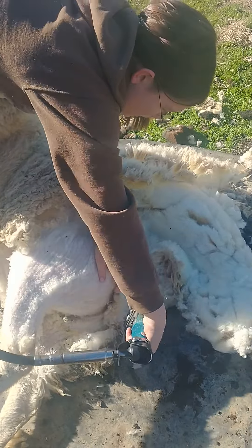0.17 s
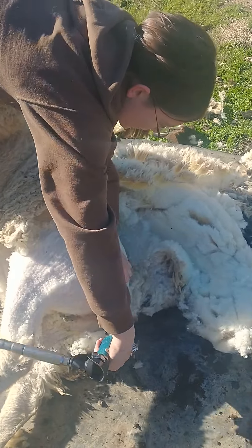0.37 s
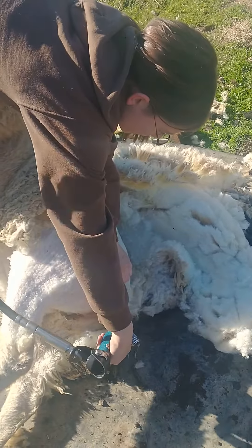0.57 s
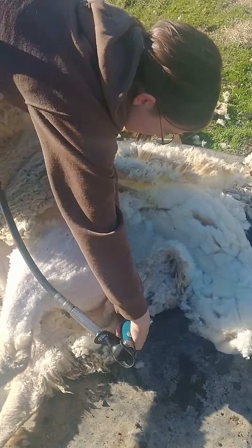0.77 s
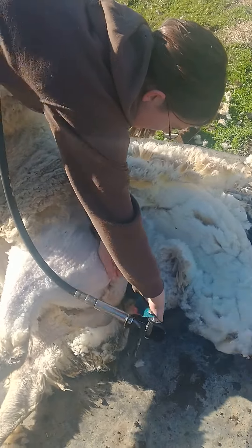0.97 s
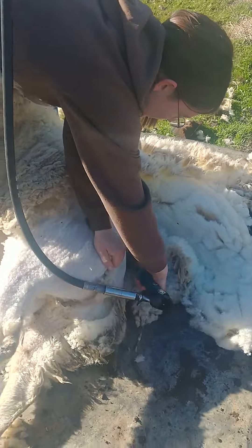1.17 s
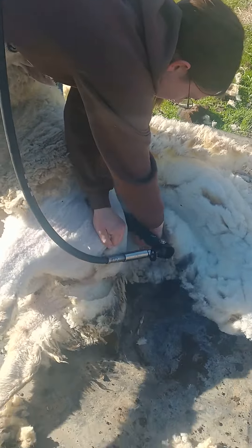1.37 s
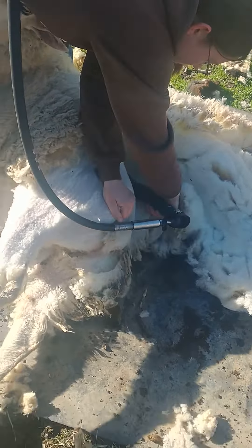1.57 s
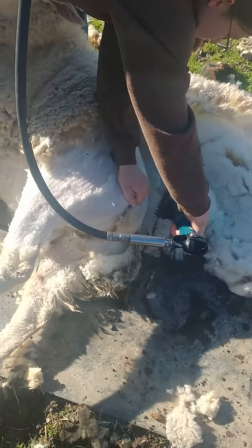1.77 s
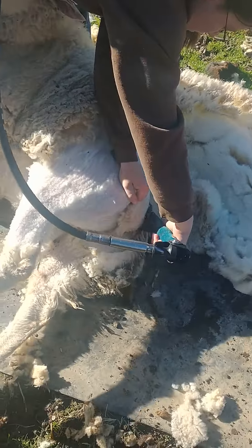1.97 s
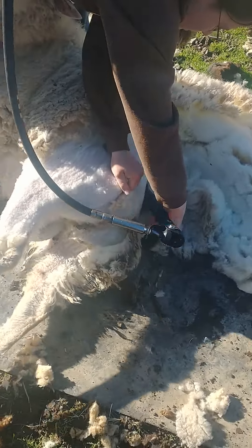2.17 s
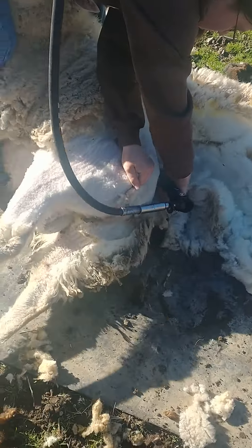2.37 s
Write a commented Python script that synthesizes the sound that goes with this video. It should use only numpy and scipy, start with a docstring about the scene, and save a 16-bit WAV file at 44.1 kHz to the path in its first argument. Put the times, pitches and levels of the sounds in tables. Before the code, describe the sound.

A powered sheep shearing handpiece buzzes and clatters steadily through wool, close up outdoors.

```python
"""Sheep shearing, close up

Outdoors, close to the microphone, a shaft-driven handpiece runs through a sheep's fleece.
The drive hums; the cutter swings about sixty times a second, buzzing, clacking at its turns
and scraping over the steel comb, which rings now and then. A little wind touches the microphone."""
import sys
import numpy as np
from scipy import signal
from scipy.fft import rfft, irfft
from scipy.io import wavfile
from scipy.ndimage import uniform_filter1d

SR = 44100
rng = np.random.default_rng(int(sys.argv[2]) if len(sys.argv) > 2 else 0)


def dump(signal):
    """Clip the signal to [-1, 1] and save it as 16-bit WAV at the path in sys.argv[1]."""
    limited = np.clip(np.atleast_2d(signal).T, -1, 1)
    pcm = np.round(limited * 32767).astype(np.int16)
    wavfile.write(sys.argv[1], SR, pcm)


N = 111132
T = np.arange(N) / SR
DRIVE_HZ, STROKE_HZ = 37.82, 59.485


def from_db(db):
    """Decibels to gain."""
    return 10 ** (np.asarray(db) / 20)

def unit_power(x):
    """Scale to a mean square of 1."""
    return x / np.sqrt(np.mean(x ** 2) + 1e-20)

def in_time(rows):
    """The columns of a timed table at every sample."""
    times, *columns = np.transpose(rows)
    return [np.interp(T, times, column) for column in columns]

def drift(rate_hz):
    """Slow random wander of unit power, changing about rate_hz times a second."""
    hz = np.fft.rfftfreq(2 * N, 1 / SR)
    spectrum = rfft(rng.standard_normal(2 * N)) / (1 + (hz / rate_hz) ** 2)
    return unit_power(irfft(spectrum)[:N])

def coloured(x, colour):
    """Give x a smooth spectrum, at unit power."""
    hz, db = np.transpose(colour)
    bins = np.fft.rfftfreq(2 * N, 1 / SR) + 1
    gain = from_db(np.interp(np.log(bins), np.log(hz), db))
    return unit_power(irfft(rfft(x, 2 * N) * gain)[:N])

def resonance(x, hz, width_hz):
    """One resonance with gain 1 at its peak."""
    r = np.exp(-np.pi * width_hz / SR)
    feedback = [1, -2 * r * np.cos(2 * np.pi * hz / SR), r * r]
    return signal.lfilter(np.array([1, 0, -1]) * (1 - r * r) / 2, feedback, x)

def turns_at(hz, wander_depth=.0007):
    """Turns made by a shaft whose speed wanders slightly."""
    wander = drift(3)
    return np.cumsum(hz * (1 + wander_depth * (wander - wander.mean()))) / SR

def partials(turns, orders, flutter):
    """Multiples of a shaft's rate, each fluttering a little in level and phase."""
    tone = np.zeros(N)
    for order, db in orders:
        amplitude = np.sqrt(2) * from_db(db) * (1 + flutter * drift(4.2))
        tone += amplitude * np.sin(2 * np.pi * (order * turns + rng.random()) + flutter * drift(13))
    return tone

def clicks(strokes, contacts, jitter_s, scatter_db, shifting_db):
    """A click for each contact of each stroke; they trade strength and shift as the load changes."""
    train, count = np.zeros(N), np.arange(int(strokes[-1]) + 1)
    for share, db in contacts:
        times = np.interp(count + share, strokes + .02 * drift(1.5), T, right=np.inf) - .001
        times += jitter_s * rng.standard_normal(len(times))
        scatter = scatter_db * rng.standard_normal(len(times))
        strength = from_db(db + scatter + shifting_db * np.interp(times, T, drift(.8)))
        inside = (times > 0) & (times < T[-1])
        train[(times[inside] * SR).astype(int)] += strength[inside]
    return train / np.sqrt(uniform_filter1d(train ** 2, size=8900) + 1e-12)   # even power over 0.2 s

def friction(hits, decay_s, steady, grain_db):
    """Gritty noise that flares at every contact and dies down to a steady share."""
    flare = unit_power(signal.lfilter([1], [1, -np.exp(-1 / (decay_s * SR))], hits))
    grit = rng.standard_normal(N) * from_db(grain_db * rng.standard_normal(N))
    return grit * np.sqrt(flare ** 2 + steady ** 2)


# spectrum of the outdoor background: (frequency [Hz], relative level [dB])
RUMBLE_COLOUR = [(25, -23.5), (50, -24), (75, -7), (120, -8.5), (165, 1.5), (235, -1), (320, -2),
                 (480, -6), (800, -3), (1500, -4.5), (4000, -27)]
def rumble():
    """The machine and the open air rumble steadily behind the shearing."""
    return from_db(-43.5) * coloured(rng.standard_normal(N), RUMBLE_COLOUR)

# puffs at the microphone: (time [s], half length [s], level [dB])
WIND_PUFFS = [(.84, 0.016, -43), (1.02, 0.035, -55), (1.914, 0.036, -38.5), (2.17, 0.064, -42),
              (2.246, 0.023, -52)]
# their spectrum: (frequency [Hz], relative level [dB])
WIND_COLOUR = [(25, -35), (55, -15), (85, 6.5), (125, 9), (170, -4.5), (400, -31.5), (1000, -42)]
def wind():
    """A few soft, low puffs of wind touch the microphone."""
    gusts = sum(from_db(db) * np.exp(-.5 * ((T - at) / half) ** 2) for at, half, db in WIND_PUFFS)
    return gusts * coloured(rng.standard_normal(N), WIND_COLOUR)

# partials of the hum: (multiple of the turn rate, level [dB])
HUM_PARTIALS = [(2, -55.5), (3, -55), (4, -55), (5, -40.5), (6, -43.5), (7, -48), (8, -49.5), (10, -52.5),
                (12, -58.5), (14, -61.5), (15, -64), (16, -60.5)]
def drive(spread_turns=.28, throb_depth=.25):
    """The drive hums and throbs twice a turn, one throb stronger."""
    turns = turns_at(DRIVE_HZ)
    hum = np.zeros(N)
    for order, db in HUM_PARTIALS:
        amplitude = np.sqrt(2) * from_db(db) * (1 + .09 * drift(8))
        lag = spread_turns * (order - 5) ** 2   # phases spread away from the strongest partial
        hum += amplitude * np.cos(2 * np.pi * (order * turns - lag))
    return hum * (1 + throb_depth * np.cos(2 * np.pi * (turns - spread_turns)))

# partials of the buzz: (multiple of the stroke rate, level [dB])
BUZZ_PARTIALS = [(2, -51), (4, -61), (6, -54.5), (12, -60.5), (13, -66.5), (14, -56.5), (15, -63),
                 (16, -56.5), (17, -56), (18, -60.5), (24, -60), (26, -59.5), (27, -65)]
# three strong partials of the whine: (time [s], lower level [dB], middle level [dB], upper level [dB])
WHINE_LEVELS = [(0, -51.5, -51.5, -51), (.6, -46, -53, -47.5), (1.0, -50, -49.5, -47.5),
                (1.3, -46, -42.5, -50.5), (1.5, -44.5, -45, -47.5), (1.77, -47.5, -39.5, -60),
                (2.1, -45.5, -40.5, -59), (2.28, -48.5, -44, -56), (2.52, -46.5, -42, -52)]
def buzz_and_whine(strokes):
    """The swinging cutter makes the handpiece buzz and whine at multiples of the stroke rate."""
    buzz = partials(strokes, BUZZ_PARTIALS, flutter=.32)
    whine = partials(strokes, zip((19, 21, 23), in_time(WHINE_LEVELS)), flutter=.09)
    return buzz + whine

# resonances of the housing: (frequency [Hz], width [Hz], level [dB])
HOUSING_MODES = [(854, 120, -54.5), (1852, 98, -49), (2665, 290, -48), (3420, 160, -48), (6180, 83, -46.5),
                 (6700, 230, -44.5)]
# hollow resonance of the handpiece: (time [s], level [dB])
HOLLOW_LEVEL = [(0, -44.5), (.7, -48.5), (1.0, -50), (1.14, -45.5), (1.5, -41.5), (1.6, -52.5),
                (2.52, -53.5)]
def housing(hits, grip_db=2, hollow_hz=1590):
    """The contacts keep the housing ringing; the grip damps and frees it, and a hollow note swells."""
    push = friction(hits, decay_s=.0018, steady=.3, grain_db=1.5)
    rings = np.zeros(N)
    for hz, width, db in HOUSING_MODES:
        grip = from_db(grip_db * drift(4.5))
        ring = resonance(resonance(push, hz, width), hz, hz / 3)
        rings += from_db(db) * unit_power(grip * ring)
    hollow = resonance(resonance(push, hollow_hz, width_hz=220), hollow_hz, width_hz=500)
    return rings + from_db(in_time(HOLLOW_LEVEL)[0]) * unit_power(hollow)

# knock at the cutter's turn: (time [s], body level [dB], tick level [dB])
KNOCK_LEVELS = [(0, -56, -58), (.28, -44, -50), (.5, -48.5, -50), (.69, -38, -57), (.88, -42.5, -48),
                (1.2, -55, -47), (1.5, -53, -41), (1.72, -48.5, -42.5), (2.02, -40.5, -51),
                (2.28, -45, -51), (2.42, -47, -37), (2.52, -51, -39)]
# spectra of the dull body and the bright tick: (frequency [Hz], relative level [dB])
DULL_COLOUR = [(500, -24), (1100, -16), (1550, -4), (1900, -1), (2200, 1), (2700, -6), (3500, -14),
               (7000, -24)]
BRIGHT_COLOUR = [(800, -23.5), (2400, -9.5), (3200, -0.5), (4100, -5), (4900, 6), (5800, -2), (7300, 0.5),
                 (8200, -13)]
def turn_knock(strokes):
    """The linkage takes up its play once a stroke: a dull knock under load, a bright tick when free."""
    hits = clicks(strokes, [(.0035, 0)], jitter_s=.00014, scatter_db=1, shifting_db=-3)
    body_db, tick_db = in_time(KNOCK_LEVELS)
    body = coloured(friction(hits, decay_s=.0023, steady=0, grain_db=.5), DULL_COLOUR)
    tick = coloured(friction(hits, decay_s=.002, steady=0, grain_db=2), BRIGHT_COLOUR)
    body /= np.sqrt(uniform_filter1d(body ** 2, size=int(SR / STROKE_HZ)).clip(.1))   # evens the knocks
    return from_db(body_db) * body + from_db(tick_db) * tick

# clatter of the linkage: (time [s], level before trim [dB])
CLATTER_LEVEL = [(0, -42.5), (.3, -39), (.6, -36.5), (.9, -46), (1.15, -37.5), (1.5, -54), (1.6, -45.5),
                 (1.78, -40), (2.0, -40), (2.2, -39), (2.52, -37.5)]
# its spectrum: (frequency [Hz], relative level [dB])
CLATTER_COLOUR = [(400, -21.5), (800, -14), (1200, -10), (1550, 0), (2200, 3.5), (2700, -15.5),
                  (3600, -10.5), (5000, -2.5), (7500, -8)]
def linkage(hits, ring_s=.0016, trim_db=-1):
    """Each contact rings the housing's many short modes and sets loose parts rattling."""
    t = T[:SR // 20]
    spectrum = rfft(rng.standard_normal(len(t)) * np.exp(-t / ring_s))
    modes = irfft(spectrum / np.sqrt(uniform_filter1d(abs(spectrum) ** 2, size=25)))   # broadly flat
    rung = unit_power(signal.fftconvolve(hits, modes[:len(t) // 2])[:N])
    rattle = unit_power(friction(hits, decay_s=.0028, steady=.1, grain_db=6))
    return from_db(in_time(CLATTER_LEVEL)[0] + trim_db) * coloured(rung + rattle, CLATTER_COLOUR)

# ring of the steel comb: (time [s], level [dB])
COMB_LEVEL = [(0, -40.5), (.12, -41), (.22, -39.5), (.3, -38), (.41, -36), (.46, -44), (.72, -43),
              (.8, -56), (.96, -40), (1.1, -59.5), (1.79, -52), (1.85, -35.5), (1.94, -45), (2.2, -45),
              (2.33, -57), (2.52, -58)]
def comb(catches, ring_hz=4914):
    """The comb's teeth ring, more or less damped by the wool."""
    push = friction(catches, decay_s=.0027, steady=.6, grain_db=3)
    ring = resonance(resonance(push, ring_hz, width_hz=160), ring_hz, width_hz=900)
    return from_db(in_time(COMB_LEVEL)[0]) * unit_power(ring)

# rasp in the wool and hiss of steel on steel: (time [s], level before trim [dB])
WOOL_LEVEL = [(0, -38), (.28, -36), (.45, -40), (.85, -37), (1.25, -37.5), (1.6, -38), (1.78, -41),
              (1.9, -37), (2.22, -34.5), (2.32, -38), (2.52, -41)]
STEEL_LEVEL = [(0, -35), (.25, -34.5), (.42, -36), (.54, -31.5), (.61, -31.5), (.67, -35), (.9, -35.5),
               (1.02, -39.5), (1.42, -38), (1.63, -43.5), (1.75, -36), (1.98, -34), (2.19, -34),
               (2.35, -39.5), (2.52, -50)]
# their spectra: (frequency [Hz], relative level [dB])
WOOL_COLOUR = [(300, -29), (600, -6.5), (1200, -9.5), (1600, -4), (2200, -0.5), (2700, 5), (3400, 2.5),
               (4200, 3), (5500, 0.5), (7500, -9.5)]
STEEL_COLOUR = [(3000, -36.5), (4400, -13), (5300, -1), (5800, 0.5), (6200, 3), (6800, 1.5), (7300, 2),
                (7650, 1.5), (8000, -13), (8400, -28.5)]
def cutter(catches, wool_trim_db=2, steel_trim_db=-1):
    """Close to the microphone, the cutter rasps through wool and hisses over the comb."""
    rasp = coloured(friction(catches, decay_s=.002, steady=1, grain_db=3), WOOL_COLOUR)
    hiss = coloured(friction(catches, decay_s=.0018, steady=.84, grain_db=2), STEEL_COLOUR)
    rasp *= from_db(in_time(WOOL_LEVEL)[0] + wool_trim_db)
    hiss *= from_db(in_time(STEEL_LEVEL)[0] + steel_trim_db)
    return rasp + hiss

# lighter contacts of the linkage: (position [share of a stroke], relative level [dB])
STROKE_CONTACTS = [(0.038, -4), (0.158, -10.5), (0.378, -1.5), (0.529, -3.5), (.71, 0), (.89, -4.5)]
def scene():
    """One microphone in the open air, close by; drive and handpiece run at their own speeds."""
    strokes = turns_at(STROKE_HZ)
    tones = buzz_and_whine(strokes)
    hits = clicks(strokes, STROKE_CONTACTS, jitter_s=.0002, scatter_db=3, shifting_db=3.5)
    catches = clicks(strokes, STROKE_CONTACTS, jitter_s=.0003, scatter_db=2, shifting_db=3.5)
    metal = turn_knock(strokes) + linkage(hits) + housing(hits) + cutter(catches) + comb(catches)
    return (tones + metal + drive() + rumble() + wind())[None]

def record(dry):
    """The recorder rolls off the top, then cuts it steeply."""
    soft = signal.sosfilt(signal.butter(14, 7700, fs=SR, output="sos"), dry)
    return signal.sosfilt(signal.ellip(12, .2, 100, 8350, fs=SR, output="sos"), soft)


dry = scene()
out = record(dry)
dump(out)
```